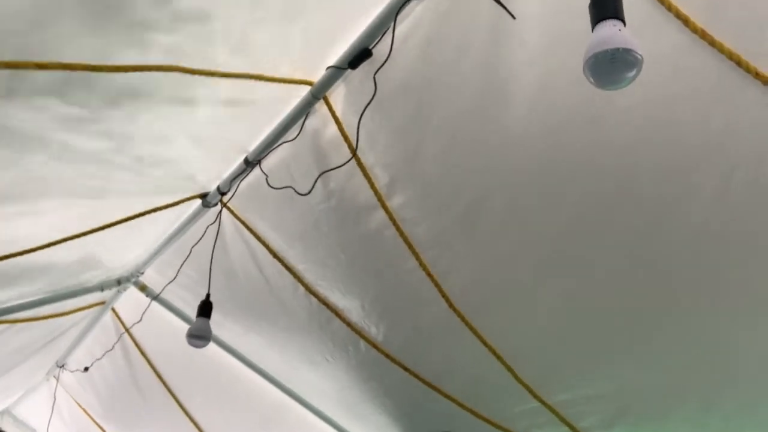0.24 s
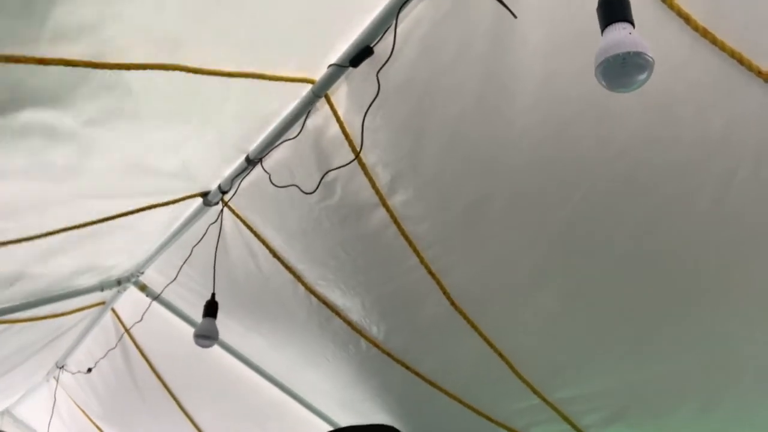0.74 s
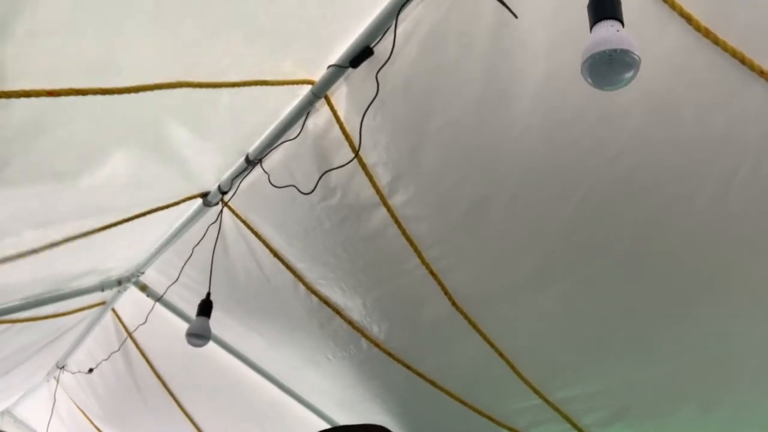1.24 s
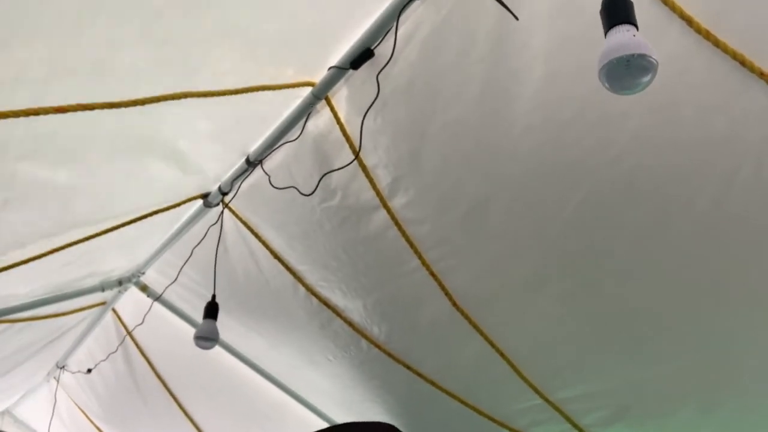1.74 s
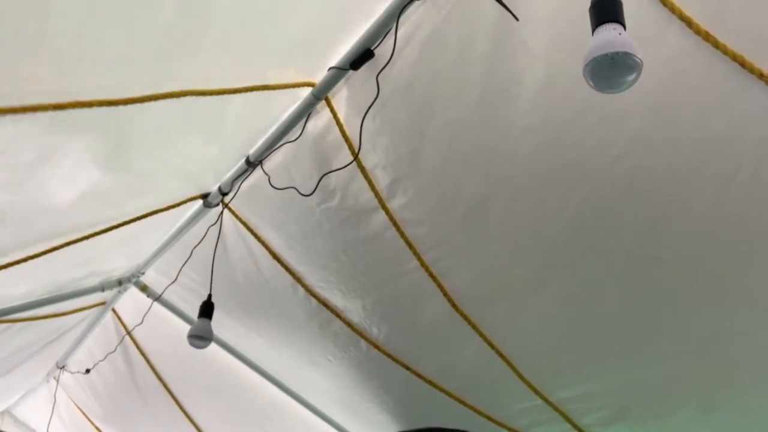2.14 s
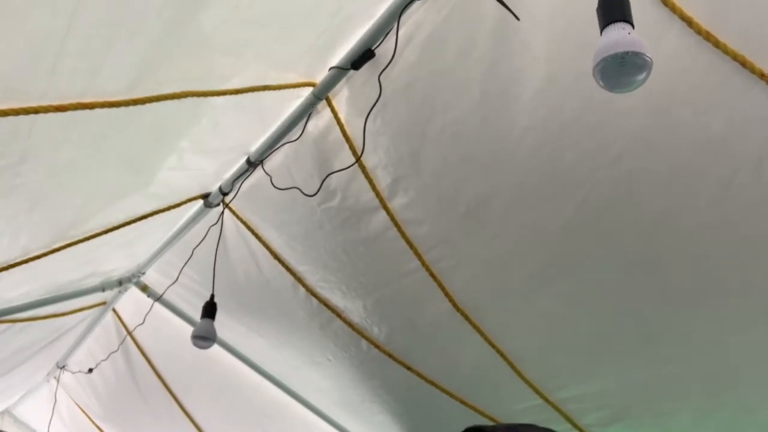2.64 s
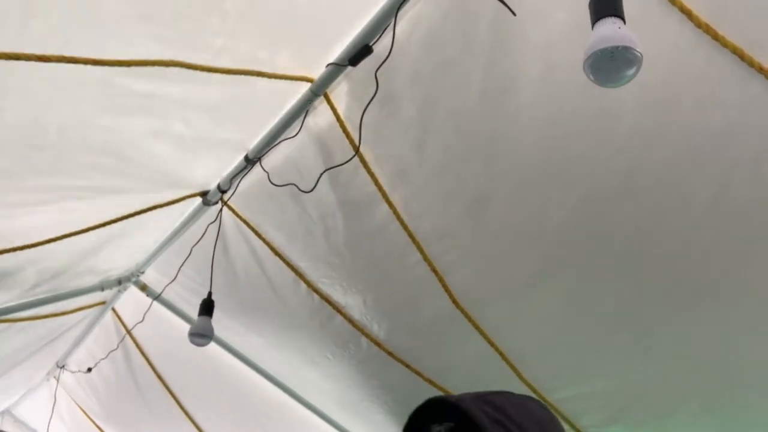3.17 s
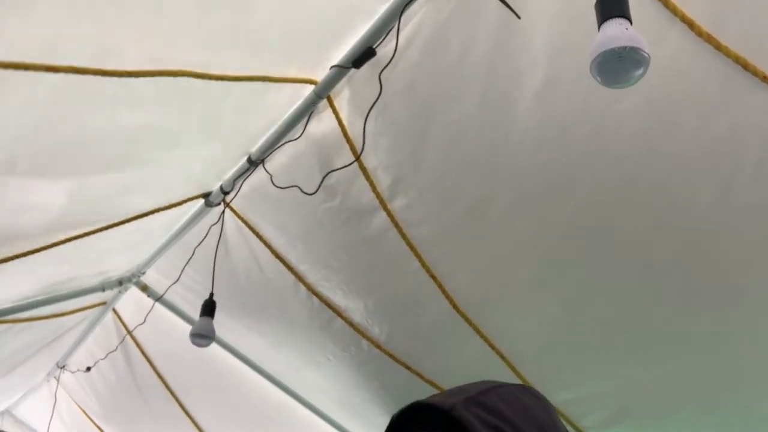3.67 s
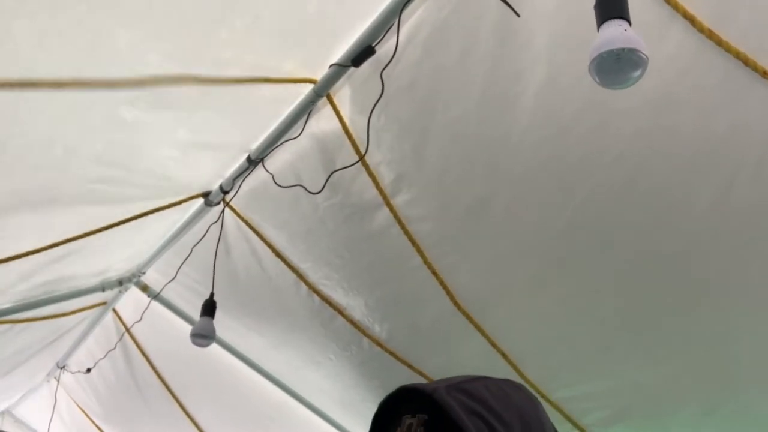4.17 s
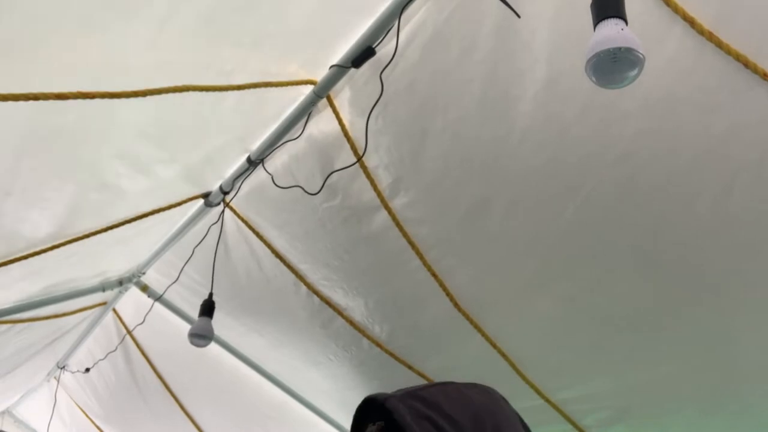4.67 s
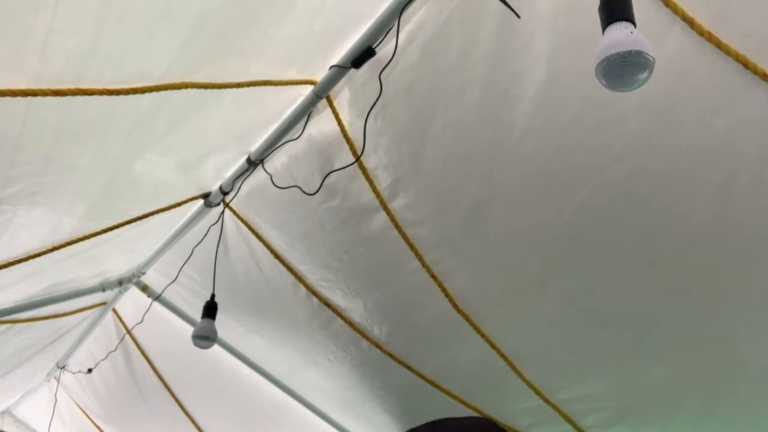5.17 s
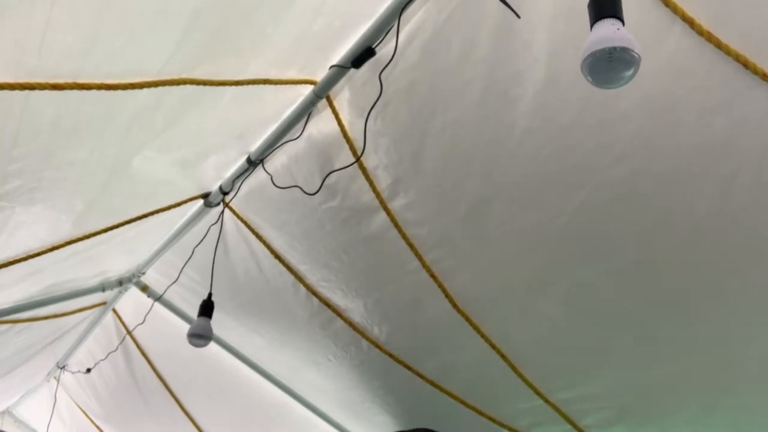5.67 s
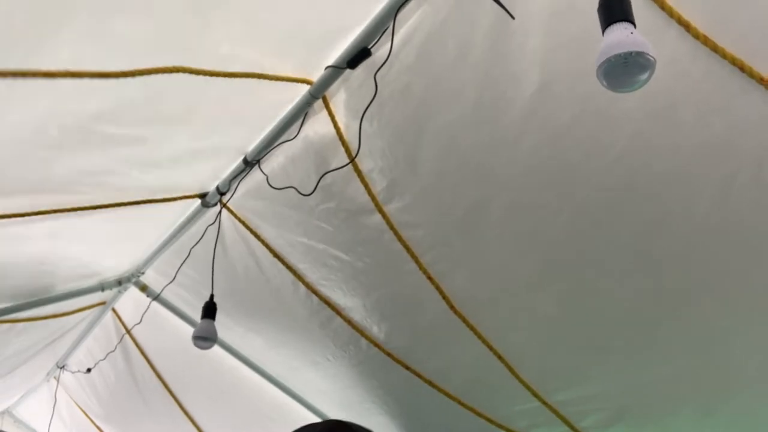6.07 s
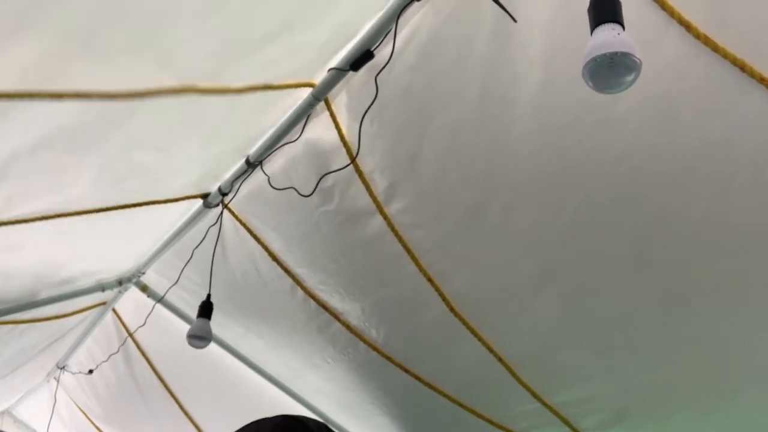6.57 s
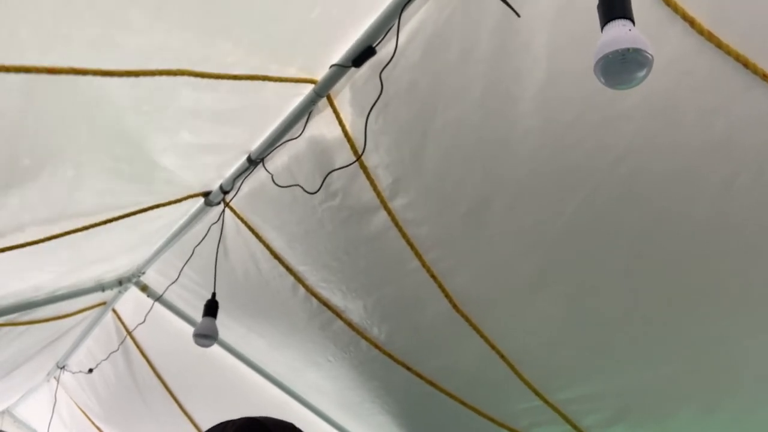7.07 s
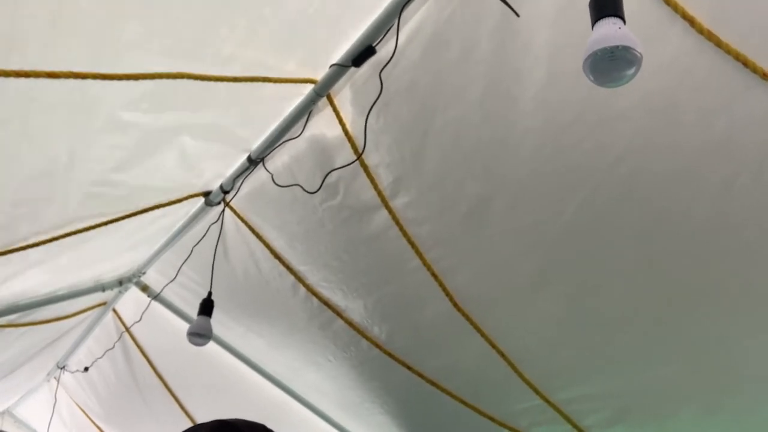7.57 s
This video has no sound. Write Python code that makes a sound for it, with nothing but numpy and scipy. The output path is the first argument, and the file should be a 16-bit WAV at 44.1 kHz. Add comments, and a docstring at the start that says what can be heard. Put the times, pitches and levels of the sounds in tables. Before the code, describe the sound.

Three bouts of snow clearing heard from beneath a taut cloth roof. Each begins abruptly with knocks and thumps, continues as irregular scrubs, crackling folds, cloth cracks and soft clump pats over rushing snow, then runs out. The middle bout is densest and loudest. Short gaps hold only small taps and trickling grains. Close stereo microphones, short tent scatter, slightly dulled top, quiet winter air behind.

```python
"""A brush handle knocks and a clump of snow pats the cloth overhead: the start of three bouts of short pushes.
Under a fabric canopy, picked up at two microphone ports, a long brush shoves the snow-laden roof upward.
Noise grains, filtered by layer, make the rumbling and crinkling cloth, the scrubbing brush and hissing snow;
sagging tones make the clumps and thumps, ringing modes the taut panel and handle, and resonant bursts the
slabs, folds and rasping bristles. The slides run out between bouts, over a faint outdoor bed."""
import sys
import numpy as np
from scipy import signal
from scipy.fft import rfft, irfft, next_fast_len
from scipy.io import wavfile
from scipy.ndimage import uniform_filter1d

SR = 44100
rng = np.random.default_rng(int(sys.argv[2]) if len(sys.argv) > 2 else 0)


def generate_wav(signal):
    """Clip the signal to [-1, 1] and save it as 16-bit WAV at the path in sys.argv[1]."""
    frames = np.transpose(np.atleast_2d(signal))
    scaled = np.clip(frames, -1, 1) * 32767
    pcm = np.round(scaled).astype(np.int16)
    wavfile.write(sys.argv[1], SR, pcm)


N = 344862

# Levels in the tables are relative; each layer adds its own trim.
# Left port minus right port: (frequency [Hz], level difference [dB])
PORT_LEVEL_DIFFERENCE = [(35, -4.5), (60, 8), (100, 8), (170, -0.5), (340, 0), (590, 2), (1060, 4),
                         (1870, 4.5), (3320, 6.5), (6500, 7), (9000, 13.5)]
# Lead of the left port over the right: (frequency [Hz], phase [rad])
PORT_PHASE_LEAD = [(25, -3), (45, 0.8), (86, 1), (129, 4.5), (170, 5), (520, 5), (720, 5.5), (880, 5.5),
                   (1100, 6.5), (1450, 7.5), (1800, 8), (2250, 5.5), (2600, 7.5), (3050, 8.5), (3800, 7),
                   (4500, 7), (5000, 5.5), (5600, 0.5), (6100, 1), (7100, -.5), (7800, -6.5), (9500, 3)]
# Spectrum of the quiet place around the canopy: (frequency [Hz], level per Hz [dB])
OUTDOOR_SPECTRUM = [(25, -1), (60, 10), (160, 8), (340, -18), (900, 3), (1800, -16.5), (2600, -20.5),
                    (6800, -29), (10500, -36)]
# Spectrum of the air pumped by the roof: (frequency [Hz], level per Hz [dB])
AIR_SPECTRUM = [(12, -41), (25, -17), (40, -2), (52, 7), (70, -4), (95, 2.5), (130, -3.5), (200, 0),
                (500, -84)]
# Air pumped by the slow sway of the whole roof: (time [s], level [dB])
ROOF_SWAY = [(0.0, -49), (0.15, -32.5), (0.45, -42.5), (1.03, -39), (1.35, -40.0), (2.3, -40.5), (2.7, -56),
             (2.935, -62), (2.96, -32), (3.55, -42), (4.4, -39.5), (4.65, -41.5), (5.05, -53), (5.45, -62),
             (5.965, -76), (6.02, -39.5), (7.05, -44), (7.82, -44)]
# The slack roof bellies out and drops back: (time [s], peak level [dB], starting pitch [Hz])
ROOF_THUMPS = [(0.554, -18.5, 89.5), (0.992, -23, 85), (1.202, -31, 160), (1.595, -28, 116),
               (2.485, -31, 126), (2.953, -10, 149), (3.505, -26, 70), (4.612, -32, 161),
               (6.017, -24.5, 148), (6.575, -24, 100.5), (6.606, -22, 120), (7.38, -28, 90)]
# Spectrum of buckling cloth: (frequency [Hz], level per Hz [dB])
CRINKLE_SPECTRUM = [(700, -17), (1400, 8.5), (2100, 0), (2600, 5.5), (3700, -1), (4800, -9), (7000, -29),
                    (10500, -59)]
# Spectrum of cracks, crunches and dry contacts: (frequency [Hz], level per Hz [dB])
CRACK_SPECTRUM = [(300, -2.5), (1000, 6), (1500, -8.5), (2500, -2.5), (3800, -5.5), (5200, -8),
                  (7000, -11.5), (9500, -24.5), (10800, -51.5)]
# The cloth snaps taut, or scrapes where the body is weak: (time [s], crack peak level [dB], # drum-like body
# level [dB], pitch of the crease [Hz], level of the lead-in swish against the crack [dB])
CLOTH_SNAPS = [(0.554, -22, -21, 1870, -16), (0.702, -20, -19.5, 2730, -4.5),
               (0.937, -26.5, -41, 2510, -14.5), (0.994, -26.5, -21, 2710, -21),
               (1.131, -28, -29, 1490, -22), (1.205, -7.5, -3, 3670, -10), (1.622, -29, -27, 2470, -13),
               (1.669, -12.5, -33.5, 3270, -5.5), (2.128, -31.5, -23, 2400, -13.5),
               (2.169, -30, -36.5, 2800, -10.5), (2.38, -46, -35, 1710, -12),
               (2.485, -34.5, -24.5, 2700, -24.5), (2.644, -48, -46.5, 2100, -25),
               (2.772, -47.5, -44, 3640, -17), (2.951, -19, -21, 4250, -28), (2.963, -17, -27.5, 3200, -17),
               (3.0202, -26.5, -15, 2900, -23.5), (3.096, -14, -26, 2710, -17),
               (3.215, -26, -30.5, 2500, -7), (3.2444, -11, -31.5, 2720, -9.5),
               (3.270, -12.5, -12.5, 4000, -12.5), (3.361, -20.5, -35.5, 4080, -18),
               (3.543, -28.5, -31, 2500, -17), (3.666, -15.5, -18.5, 4130, -19),
               (4.096, -13, -33, 2040, -9), (4.192, -17, -20, 3870, -19), (4.617, -9.5, -3.5, 2610, -8.5),
               (4.977, -43, -45, 2980, -18), (5.374, -41.5, -38.5, 4250, -12), (5.790, -50, -45, 2200, -5),
               (5.977, -27.5, -27, 3280, -14), (6.077, -31, -16, 2540, -6.5), (6.531, -21, -28, 3500, -9.5),
               (6.584, -18.5, -30.5, 2200, 0.5), (6.592, -21, -14.5, 1900, -17),
               (6.631, -18.5, -11.5, 2800, -1), (6.648, -21, -11, 3260, -12),
               (6.831, -26.5, -33, 2690, -13), (6.885, -26.5, -17, 2440, -16.5),
               (7.195, -27, -25, 2270, -23), (7.282, -20, -28, 3050, -8), (7.326, -30, -17.5, 2240, -11),
               (7.376, -18.5, -29.5, 2450, -22)]
# What a taut panel rings with at its usual tension: (frequency [Hz], level [dB], t60 [s])
PANEL_MODES = [(159.5, 4.5, 0.064), (232, 7.5, 0.017), (329.4, 1.5, 0.076), (770, 7.5, 0.0042),
               (974, 0, 0.03)]
# Spectrum of heavy lumps drumming on the roof: (frequency [Hz], level per Hz [dB])
RUMBLE_SPECTRUM = [(90, -20), (125, -9.5), (168, 2), (235, -6), (320, 0.5), (440, -5), (620, -18.5),
                   (1100, -28.5), (3000, -85.5)]
# Spectrum of snow crystals rubbing over the weave: (frequency [Hz], level per Hz [dB])
HISS_SPECTRUM = [(900, 7.5), (2000, -6.5), (3000, 1.5), (4300, 1), (5000, 1), (5700, -1), (6700, 1.5),
                 (7700, -3), (9000, -6.5), (9800, -15.5), (10600, -70)]
# Snow set off at once in each bout, then running out:
# (time [s], level of heavy lumps [dB], level of fine powder [dB])
FIRST_BOUT_SLIDE = [(0.0, -44, -39), (0.395, -39.5, -43.5), (0.798, -40, -43.5), (1.148, -38, -41.5),
                    (1.748, -38, -46), (2.273, -48, -49), (2.518, -44.5, -57.5), (2.6, -51, -61),
                    (2.696, -54, -60.5), (2.816, -68.5, -66.5), (2.928, -63, -67)]
SECOND_BOUT_SLIDE = [(2.947, -40, -39.5), (3.171, -28.5, -38), (3.39, -31, -34.5), (3.718, -30, -38.5),
                     (3.993, -29, -41), (4.495, -31, -42), (4.67, -29.5, -39.5), (4.8, -33, -43.5),
                     (4.9, -37.5, -47.5), (4.961, -48.5, -51), (5.15, -48, -52.5), (5.25, -56.5, -55),
                     (5.39, -58.5, -60), (5.495, -75, -60), (5.62, -67, -62.5), (5.727, -64, -57),
                     (5.966, -66, -69.5)]
THIRD_BOUT_SLIDE = [(5.987, -29.5, -36.5), (6.134, -29.5, -46), (6.484, -38, -41.5), (6.771, -27, -42),
                    (7.06, -42.5, -45.5), (7.15, -32, -45.5), (7.436, -36, -46), (7.68, -31, -47),
                    (7.749, -53, -49.5), (7.82, -64, -55)]
# Clumps land on the roof: (time [s], peak level [dB], pitch they settle to [Hz])
CLUMP_PATS = [(0.123, -20.5, 400), (0.192, -27, 594), (0.556, -28, 250), (0.635, -19.5, 570),
              (0.993, -17, 530), (1.421, -21.5, 716), (3.399, -16.5, 595), (4.184, -21.5, 198),
              (4.221, -18.5, 262), (4.39, -22.5, 323), (4.578, -18, 654), (4.764, -26.5, 338),
              (4.792, -20.5, 354), (4.885, -34, 183), (4.992, -39.5, 347), (5.093, -41.5, 290),
              (5.134, -53, 248), (5.279, -37, 344), (5.37, -34.5, 340), (5.546, -46, 600),
              (5.641, -47.5, 296), (5.782, -44, 223), (5.824, -43, 298), (5.913, -40, 310),
              (6.016, -17.5, 340), (6.132, -18.5, 497), (6.341, -22, 252), (6.516, -29.5, 335),
              (7.042, -27, 490), (7.09, -49.5, 308), (7.139, -27, 660), (7.347, -16.5, 556),
              (7.505, -29, 260), (7.703, -31.5, 258), (7.771, -32, 590)]
# Heavy slabs slump on the roof: (time [s], length [s], level [dB], pitch [Hz])
SLAB_SLUMPS = [(2.425, 0.025, -44, 168), (2.66, 0.026, -45.5, 202), (3.44, 0.02, -26, 170),
               (3.505, 0.012, -20, 165), (4.622, 0.0075, -22, 191), (6.606, 0.048, -21, 623),
               (6.682, 0.028, -17.5, 295), (6.887, 0.015, -30, 476), (7.233, 0.018, -26.5, 348),
               (7.334, 0.077, -28, 300), (7.623, 0.034, -26.5, 392)]
# Spectrum of the brush head sticking and slipping: (frequency [Hz], level per Hz [dB])
SCRUB_SPECTRUM = [(250, -10.5), (420, -9), (550, 5.5), (720, 4.5), (880, 1.5), (1100, 1), (1400, -9),
                  (1700, -13), (2100, -27.5), (4000, -73)]
# Pushes of the brush: (start time [s], length [s], force level [dB], growth of the force during the push [dB],
# crinkle against force [dB], loosened powder against force [dB], pitch of the rubbed patch [Hz])
BRUSH_PUSHES = [(0.125, 0.099, -28.5, 0, -5.5, -5.5, 870), (0.302, 0.042, -34.5, 5, -11.5, -28, 435),
                (0.573, 0.056, -30.5, -11.5, -9.5, -8.5, 587), (0.64, 0.069, -28.5, 4, -4.5, -7, 605),
                (0.856, 0.094, -37, 4.5, -3.5, -10.5, 847), (1.002, 0.02, -33, -3.5, -5, -7.5, 487),
                (1.082, 0.13, -28, 8, -7, -9.5, 372), (1.376, 0.06, -37.5, 15.5, -6.5, -6, 670),
                (1.592, 0.066, -28, 9, -4, -12.5, 635), (1.805, 0.096, -37.0, 5, -7, -7.5, 613),
                (2.02, 0.17, -36.5, -4, -14, -40, 360), (2.315, 0.11, -38, 2, -11, -26, 232),
                (2.477, 0.007, -38.5, -5.5, -5.5, -22, 360), (2.872, 0.04, -56, -6, -4, -24, 870),
                (2.985, 0.0097, -32, -1.5, -23, -16, 766), (3.031, 0.065, -26.5, -5.5, -11.5, -29.5, 342),
                (3.222, 0.067, -24.5, 0.5, 0.5, -11.5, 735), (3.396, 0.05, -29.5, 1, -8.5, -2, 306),
                (3.492, 0.056, -25.5, 6.5, -7, -8.5, 304), (3.613, 0.054, -26, -1, -7, -31, 703),
                (3.768, 0.13, -31, 0, -6.5, -4.5, 275), (4.041, 0.063, -27.5, 0, -1.5, -15, 880),
                (4.18, 0.12, -34, 4.5, 1, -3.5, 1210), (4.608, 0.0033, -25, 7.5, -5, -6, 563),
                (5.274, 0.11, -53, -2, -21.5, -17, 352), (5.725, 0.06, -61.5, 6.5, -24, -21, 1030),
                (5.806, 0.11, -52.5, 2, -26, -20, 720), (6.03, 0.051, -25.5, -6.5, -7.5, -27.5, 324),
                (6.124, 0.046, -31.5, -7, -9, -22.5, 595), (6.215, 0.097, -25, 2.5, -10, -21.5, 364),
                (6.548, 0.15, -27, 6.5, -4, -14, 1100), (6.834, 0.066, -24.5, 7.5, -11, -24, 550),
                (7.2, 0.043, -33.5, -6, -3, -7.5, 350), (7.277, 0.1, -27, -5, -4, -16, 1144),
                (7.42, 0.016, -31, -5, -17.5, -27, 464), (7.602, 0.036, -35.5, -9, -19, -25, 517),
                (7.792, 0.082, -36, 1.5, -2.5, -4.5, 228)]
# Bristles catch on the coated cloth: (time [s], length [s], level [dB], pitch [Hz])
BRISTLE_RASPS = [(0.202, 0.012, -32, 2500), (1.130, 0.005, -35, 4750), (1.654, 0.014, -22.5, 2430),
                 (2.644, 0.0044, -53, 2030), (2.768, 0.0072, -62, 3280), (2.96, 0.0052, -23, 3150),
                 (3.024, 0.005, -31, 2900), (3.064, 0.008, -28, 2600), (3.097, 0.0098, -33, 4900),
                 (3.424, 0.012, -28, 2840), (3.496, 0.01, -28.5, 2670), (3.664, 0.007, -33, 5250),
                 (3.726, 0.0103, -33, 2500), (3.78, 0.01, -32, 2330), (4.035, 0.02, -34, 2240),
                 (4.08, 0.029, -29, 2100), (4.988, 0.013, -49, 3010), (5.155, 0.005, -52, 3700),
                 (5.645, 0.004, -58, 2900), (6.022, 0.01, -37, 3100), (6.147, 0.008, -40, 2760),
                 (6.186, 0.0054, -37, 2240), (6.551, 0.01, -34.5, 2550), (6.581, 0.011, -27, 5200),
                 (6.586, 0.005, -22.5, 3820), (6.65, 0.0057, -33, 2360), (6.679, 0.012, -36, 2150),
                 (6.829, 0.008, -30, 2670), (6.882, 0.013, -28.5, 2500), (7.195, 0.006, -42, 4820),
                 (7.282, 0.01, -39, 5340), (7.375, 0.0035, -20, 2500)]
# The handle knocks in its socket: (time [s], peak level [dB], upper modes against the lowest [dB])
SOCKET_KNOCKS = [(0.087, -18.5, 9), (0.474, -19.5, 3), (0.664, -18, 17), (0.935, -19.5, 6),
                 (1.076, -22, 11), (1.130, -17, -3), (1.623, -16, 4), (1.665, -13.5, -5), (2.567, -36, 6),
                 (2.851, -37, 2), (2.953, -20, 0), (2.9655, -12.5, -9), (3.021, -13.5, -4.5),
                 (3.198, -15.5, 12), (3.296, -17, 12), (3.543, -14, -12), (3.622, -22, -1),
                 (3.666, -12, -7), (4.102, -18, 5), (4.176, -20, 5), (4.272, -16.5, 17), (4.464, -19.5, 5),
                 (5.011, -36, 12), (5.281, -38, 12), (5.370, -40, 3), (5.463, -46, 8), (5.563, -49, 6),
                 (5.643, -44, 2), (5.826, -40, -2), (5.856, -38, -3), (5.887, -34, -6), (5.9135, -27, -7),
                 (6.019, -22, -7), (6.133, -18, -11), (6.208, -27, -1), (6.563, -24, -3), (6.5925, -10, 4),
                 (6.675, -11.5, -11), (7.197, -25, 7), (7.285, -19, 15)]
# What the handle rings with before the grip detunes it: (frequency [Hz], level [dB], t60 [s])
HANDLE_MODES = [(732, 5.5, 0.024), (941, -1, 0.031), (1095, -1, 0.027)]

TENT_T60_S, CUTOFF_HZ, OUTDOORS_DB = 0.14, 10400, -71
# Thumps, counted in cycles of the starting pitch: until the pitch has halved; decay by 60 dB
THUMP_SAG_CYCLES, THUMP_T60_CYCLES = 3.3, 16.6
# The jerk of a snap: starting pitch, time to halve it, decay, level against the body
WHIP_HZ, WHIP_FALL_S, WHIP_T60_S, WHIP_DB = 3520, 0.00061, 0.026, -5
CRACK_T60_S = 0.036
# Attack times are the last 20 dB of the rise; t60 follows the end of the event
PUSH_ATTACK_S, PUSH_T60_S = 0.037, 0.15
SLUMP_ATTACK_S, SLUMP_T60_S = 0.0045, 0.082
RASP_ATTACK_S, RASP_T60_S = 0.0015, 0.03
# Layers against the force of the push
PUSH_RUMBLE_DB, PUSH_SCRUB_DB, PUSH_BILLOW_DB = -1.5, -0.33, -8.5
# Rumble and scrub against the lumps; crinkle and hiss against the powder; trim of the sway
SLIDE_RUMBLE_DB, SLIDE_SCRUB_DB = -2, -2.0
SLIDE_CRINKLE_DB, SLIDE_HISS_DB = 0, 0.5
SWAY_DB = 0.5
# The sliding snow breaks into lumps: how fast and how far its level swings
CLUMPING_RATE_HZ, CLUMPING_DB = 22, 1.36
SLUMP_WIDTH = 0.45  # narrower resonance of the boom, as a share of its pitch
# The patch under the brush head: mean slip rate, resonance width, level against the force
PATCH_SLIPS_PER_S, PATCH_WIDTH_HZ, PATCH_DB = 190, 50, -8.5
# Bristles skipping over the weave: narrower resonance of the fold, mean slip rate
RASP_WIDTH_HZ, RASP_SLIPS_PER_S = 320, 1900
# The bristles soften the blow; level of the ring; level of the dry contact tick
KNOCK_RISE_S, KNOCK_DB, KNOCK_TICK_DB = 0.0016, -2.5, -21


def from_db(db):
    """Decibels to amplitude gain."""
    return 10 ** (np.asarray(db) / 20)


def together(*levels_db):
    """The level of several unrelated sounds at once: their powers add."""
    return 10 * np.log10(sum(from_db(db) ** 2 for db in levels_db) + 1e-12)


def rms_one(x):
    """Scale a sound so that the mean of its channels has rms 1."""
    middle = np.atleast_2d(x).mean(axis=0)
    return x / np.sqrt(np.mean(middle ** 2) + 1e-20)


def evened(x, size):
    """Hold the level steady over about size samples, keeping the fine grain; rms 1."""
    power = uniform_filter1d(np.mean(x ** 2, axis=0), size)
    return rms_one(x / np.sqrt(power + 1e-6))


def in_time(rows):
    """Interpolate the columns of a curve, sample by sample."""
    times, *columns = np.transpose(rows)
    return [np.interp(np.arange(N) / SR, times, column) for column in columns]


def at_hz(points, hz):
    """Read a table on a log-frequency axis."""
    points = np.array(points)
    return np.interp(np.log(hz + 1), np.log(points[:, 0]), points[:, 1])


def add(track, s, sound):
    """Lay a short sound into a track at time s."""
    start = int(np.clip(round(s * SR), 0, N - 1))
    track[..., start:start + sound.shape[-1]] += sound[..., :N - start]


def drift(rate):
    """Slow chance with spread 1: noise through two equal poles at rate [Hz], drawn every 40 samples."""
    pole = np.exp(-80 * np.pi * rate / SR)
    noise = rng.standard_normal(N // 40 + 2002)
    slow = signal.lfilter([1], [1, -2 * pole, pole * pole], noise)[2000:]  # drop the filter's run-in
    return np.interp(np.arange(N) / 40, np.arange(len(slow)), rms_one(slow))


def colour(x, spectrum, size=4096):
    """Causal (minimum-phase) filter with the given spectrum."""
    gain = from_db(at_hz(spectrum, np.fft.rfftfreq(size, 1 / SR)))
    cepstrum = irfft(np.log(gain))
    cepstrum[1:size // 2] *= 2
    cepstrum[size // 2 + 1:] = 0
    impulse = irfft(np.exp(rfft(cepstrum)))
    return signal.oaconvolve(x, impulse[None], axes=1)[:, :N]


def ports(x):
    """The recorder's body shades and delays one microphone port against the other."""
    size = next_fast_len(N + SR // 10)
    hz = np.fft.rfftfreq(size, 1 / SR)
    tilt = from_db(at_hz(PORT_LEVEL_DIFFERENCE, hz))
    delay = np.exp(-1j * at_hz(PORT_PHASE_LEAD, hz))
    pair = np.array([tilt, delay]) * 2 / (tilt + 1)
    return irfft(rfft(x, size) * pair, size)[:, :N]


def tent(clicks, wet_db):
    """Every click arrives directly, then as a brief scatter off the cloth, different at each port."""
    keep = from_db(-120 / (TENT_T60_S * SR))  # energy kept per sample
    energy = signal.lfilter([0, 1 - keep], [1, -keep], clicks ** 2 + 1e-18)
    scatter = np.sqrt(energy) * rng.standard_normal((2, len(clicks)))
    return (clicks + from_db(wet_db) * scatter) / np.hypot(1, from_db(wet_db))


def struck(ringing, wet_db):
    """A ringing sound set off by one blow somewhere on the roof, with its scatter."""
    blow = np.zeros(SR // 8)
    blow[0] = 1
    return signal.oaconvolve(tent(blow, wet_db), ringing[None], axes=1)


def grains(per_s, spread_db, wet_db, spectrum):
    """Tiny contacts of uneven size, scattered through the tent; rms 1."""
    sizes = from_db(spread_db * np.minimum(rng.exponential(1, N), 4))
    sizes = sizes * rng.choice([-1, 1], N)
    happens = rng.random(N) < per_s / SR
    clicks = sizes * happens / np.sqrt(np.minimum(per_s, SR))  # density leaves the level alone
    return rms_one(ports(colour(tent(clicks, wet_db), spectrum)))


def crease(burst, hz, width_hz):
    """The resonance of one small patch of stiff cloth, gain about 1 at its top."""
    r = np.exp(-np.pi * width_hz / SR)
    zeros = np.array([1, 0, -1]) * (1 - r * r) / 2
    poles = [1, -2 * r * np.cos(2 * np.pi * hz / SR), r * r]
    return signal.lfilter(zeros, poles, burst)


def scattered_ticks(level_db, low_hz, octaves, width_hz, over_db, count):
    """Small resonant contacts at random times, each with its own pitch, louder when the roof is busy."""
    out = np.zeros((2, N))
    t = np.arange(SR // 25) / SR
    for when, size, pitch in rng.random((count, 3)):
        shared = rng.standard_normal(len(t))
        own = rng.standard_normal((2, len(t)))  # differs between the channels
        burst = (shared + 0.85 * own) * from_db(-60 * t / 0.026)
        tick = crease(burst, low_hz * 2 ** (octaves * pitch), width_hz)
        peak_db = level_db[int(when * N)] + over_db + 1.0 * size ** 2
        add(out, when * N / SR, from_db(peak_db) * tick / abs(tick).max())
    return ports(out)


def quiet_outdoors():
    """The quiet winter day around the canopy: steady coloured noise, independent in the two channels."""
    return from_db(OUTDOORS_DB) * rms_one(colour(rng.standard_normal((2, N)), OUTDOOR_SPECTRUM))


def billowing_roof(level_db):
    """The roof pumps air as it sways; the longest waves reach both ports alike."""
    highpass = signal.butter(2, 55, "high", fs=SR, output="sos")
    eddies = signal.sosfilt(highpass, rng.standard_normal((2, N)))
    sway = rng.standard_normal(N) + 1.34 * eddies
    return from_db(level_db - 1.5) * evened(ports(colour(sway, AIR_SPECTRUM)), size=6000)


def roof_thumps():
    """The loaded roof bounces with a deep thump whose pitch sinks as the cloth goes slack."""
    out = np.zeros((2, N))
    t = np.arange(SR // 4) / SR
    for s, db, hz in ROOF_THUMPS:
        cycles = hz * t
        swing = (1 - np.exp(-cycles / 0.6)) ** 2 * from_db(-60 * cycles / THUMP_T60_CYCLES)
        turns = THUMP_SAG_CYCLES * np.log1p(cycles / THUMP_SAG_CYCLES)
        thump = swing / swing.max() * np.sin(2 * np.pi * turns)
        add(out, s, struck(from_db(db - 4.5) * thump, wet_db=-7.0))
    return ports(out)


def crinkling_cloth(level_db):
    """Stiff coated cloth buckles in small flurries of creases."""
    per_s = 1800 * from_db(0.5 * (level_db + 38.5))
    creases = grains(per_s, spread_db=3.3, wet_db=2.5, spectrum=CRINKLE_SPECTRUM)
    return from_db(level_db + 1.7 * drift(32) - 5.5) * creases


def popping_folds(level_db):
    """Single folds flip over with a dry tick."""
    return scattered_ticks(level_db, low_hz=1500, octaves=1.8, width_hz=200, over_db=2.5, count=480)


def whip():
    """The jerk of a snap spreads through the cloth, treble first: a quickly falling chirp, peak near 1."""
    t = np.arange(SR // 30) / SR
    turns = WHIP_HZ * WHIP_FALL_S * np.log1p(t / WHIP_FALL_S)
    return np.sin(2 * np.pi * turns) * from_db(-60 * t / WHIP_T60_S)


def ringing_panel():
    """A taut panel rings in decaying modes; no two snaps find it equally tight."""
    t = np.arange(SR // 6) / SR
    tension = 1 + 0.021 * rng.standard_normal()
    panel = np.zeros(len(t))
    for k, (hz, db, t60) in enumerate(PANEL_MODES):
        mode = from_db(db - 60 * t / t60) * np.sin(2 * np.pi * hz * tension * t)
        panel += (-1) ** k * mode
    return panel


def taut_snaps():
    """The slack runs out in a rising swish, the cloth cracks, and the panel rings like a slack drum."""
    cracks, drums = np.zeros((2, N)), np.zeros((2, N))
    t = np.arange(SR // 6) / SR
    for s, crack_db, body_db, crease_hz, swish_db in CLOTH_SNAPS:
        swish = rng.standard_normal((2, len(t))) * from_db(swish_db - 60 * t[::-1] / 0.11)
        add(cracks, s - t[-1], from_db(crack_db + 4.0) * swish)
        add(drums, s, from_db(body_db + WHIP_DB) * struck(whip(), wet_db=-14.0))
        crack = rng.standard_normal(len(t)) * from_db(-60 * t / CRACK_T60_S)
        crack = from_db(crack_db + 5.0) * tent(crack, wet_db=-1.0)
        add(cracks, s, crack + 2.2 * crease(crack, crease_hz, width_hz=200))
        panel = from_db(body_db - 8.5) * struck(ringing_panel(), wet_db=-23.5)
        add(drums, s + 0.00284, panel)  # the low waves lag behind the crack
    return ports(colour(cracks, CRACK_SPECTRUM) + drums)


def sliding_snow(level_db):
    """Countless crystals rub over the weave."""
    per_s = 6000 * from_db(0.8 * (level_db + 44.0))
    crystals = grains(per_s, spread_db=2.5, wet_db=4.0, spectrum=HISS_SPECTRUM)
    return from_db(level_db + 0.95 * drift(40) + 0.06) * crystals


def tumbling_snow(level_db):
    """Heavy lumps drum on the membrane; the harder the shove, the more of them."""
    per_s = 500 * from_db(0.5 * (level_db + 34.0))
    lumps = grains(per_s, spread_db=1.0, wet_db=-10.5, spectrum=RUMBLE_SPECTRUM)
    return from_db(level_db + 0.2 * drift(25) - 2.0) * evened(lumps, size=6000)


def rolling_crumbs(level_db):
    """Small lumps knocked loose by the brush hop down the roof."""
    return scattered_ticks(level_db, low_hz=440, octaves=1.5, width_hz=60, over_db=4, count=240)


def flap(hz, cycles, glide, rise):
    """A blow on a membrane: a few cycles that sag in pitch, as the low waves arrive last."""
    turn = np.arange(SR // 4) / SR * hz
    swing = (1 - np.exp(-turn / rise)) ** 2 * from_db(-60 * turn / cycles)
    return swing / swing.max() * np.sin(2 * np.pi * (turn + glide * (1 - np.exp(-turn))))


def landing_clumps():
    """Each clump gives a short hollow pat, and crumbles with a faint crunch."""
    pats, crunches = np.zeros((2, N)), np.zeros((2, N))
    t = np.arange(SR // 12) / SR
    for s, db, hz in CLUMP_PATS:
        pat = from_db(db) * flap(hz, cycles=9, glide=0.4, rise=0.7)
        add(pats, s, struck(pat, wet_db=-3.0))
        crunch = rng.standard_normal((2, len(t))) * from_db(-60 * t / 0.072)
        add(crunches, s, from_db(db - 9.5) * crunch)
    return ports(pats + colour(crunches, CRACK_SPECTRUM))


def slumping_slabs():
    """A slab comes down as a quick crowd of soft blows, and the loaded cloth booms under it."""
    out = np.zeros((2, N))
    t = np.arange(-SR // 20, SR // 5) / SR
    for s, length, db, hz in SLAB_SLUMPS:
        blows = tent(rng.standard_normal(len(t)), wet_db=-15.0)
        boom = crease(blows, hz, SLUMP_WIDTH * hz)
        boom = crease(boom, hz, 2 * SLUMP_WIDTH * hz)
        boom = evened(rms_one(boom), size=900)
        attack_db = 20 * np.minimum(t, 0) / SLUMP_ATTACK_S
        release_db = -60 * np.maximum(t - length, 0) / SLUMP_T60_S
        add(out, s + t[0], boom * from_db(db + attack_db + release_db))
    return ports(out)


def push_shape(t, length, growth_db):
    """A push takes hold fast, grows or eases while it lasts, then the cloth settles; dB."""
    attack = 20 * np.minimum(t, 0) / PUSH_ATTACK_S
    hold = growth_db * (np.clip(t / length, 0, 1) - 0.5)
    release = -60 * np.maximum(t - length, 0) / PUSH_T60_S
    return attack + hold + release


def pushing():
    """Add the powers of all pushes: dB of force, crinkle and loosened powder over time."""
    power = np.zeros((3, N))
    t = np.arange(-SR // 10, SR // 2) / SR
    for s, length, force_db, growth_db, crinkle_db, powder_db, _ in BRUSH_PUSHES:
        shares_db = np.array([[0], [crinkle_db], [powder_db]])
        levels_db = force_db + push_shape(t, length, growth_db) + shares_db
        add(power, s + t[0], from_db(levels_db) ** 2)
    return 10 * np.log10(power + 1e-12)


def handle_knocks():
    """The handle gives a short hollow knock; where it is hit decides how much the upper modes speak."""
    rings, ticks = np.zeros((2, N)), np.zeros((2, N))
    t = np.arange(SR // 12) / SR
    for s, db, upper_db in SOCKET_KNOCKS:
        grip = 1 + 0.025 * rng.standard_normal(len(HANDLE_MODES))  # the grip detunes each mode a little
        ring = np.zeros(len(t))
        for k, (hz, mode_db, t60) in enumerate(HANDLE_MODES):
            swing = from_db(mode_db + upper_db * (k > 0) - 60 * t / t60)
            ring += swing * np.sin(2 * np.pi * hz * grip[k] * t)
        ring = ring * (1 - np.exp(-t / KNOCK_RISE_S))
        knock = from_db(db + KNOCK_DB) * ring / abs(ring).max()
        add(rings, s, struck(knock, wet_db=-9.5))
        tick = rng.standard_normal((2, len(t))) * from_db(-60 * t / 0.03)
        add(ticks, s, from_db(db + KNOCK_TICK_DB) * tick)
    return ports(rings + colour(ticks, CRACK_SPECTRUM))


def rasping_bristles():
    """The bristles skip over a tight fold in a quick run of slips, and the fold rings at its own pitch."""
    out = np.zeros((2, N))
    t = np.arange(-SR // 50, SR // 12) / SR
    for s, length, db, hz in BRISTLE_RASPS:
        slips = rng.standard_normal(len(t)) * (rng.random(len(t)) < RASP_SLIPS_PER_S / SR)
        rasp = crease(tent(slips, wet_db=6.5), hz, RASP_WIDTH_HZ)
        rasp = crease(rasp, hz, 4 * RASP_WIDTH_HZ)
        rasp = evened(rms_one(rasp), size=300)
        attack_db = 20 * np.minimum(t, 0) / RASP_ATTACK_S
        release_db = -60 * np.maximum(t - length, 0) / RASP_T60_S
        add(out, s + t[0], rasp * from_db(db - 5.5 + attack_db + release_db))
    return ports(out)


def rubbed_patches():
    """Each push tightens one patch of cloth, which the slipping bristles set droning at its own pitch."""
    out = np.zeros((2, N))
    t = np.arange(-SR // 10, SR // 3) / SR
    for s, length, force_db, growth_db, _, _, patch_hz in BRUSH_PUSHES:
        slips = rng.standard_normal(len(t)) * (rng.random(len(t)) < PATCH_SLIPS_PER_S / SR)
        drone = crease(tent(slips, wet_db=-14.0), patch_hz, PATCH_WIDTH_HZ)
        drone = evened(rms_one(drone), size=2500)
        drone_db = force_db + PATCH_DB + push_shape(t, length, growth_db)
        add(out, s + t[0], drone * from_db(drone_db))
    return ports(out)


def scrubbing_brush(level_db):
    """The brush head sticks and slips on the loaded cloth."""
    per_s = 1400 * from_db(0.5 * (level_db + 34))
    slips = grains(per_s, spread_db=0.5, wet_db=-2.0, spectrum=SCRUB_SPECTRUM)
    return from_db(level_db - 3.5) * evened(from_db(2.3 * drift(30)) * slips, size=6000)


def scene():
    """Pushes and sliding snow drive the roof's continuous layers; single events follow their tables."""
    force_db, buckling_db, loosened_db = pushing()
    lumps_db, powder_db = in_time([*FIRST_BOUT_SLIDE, *SECOND_BOUT_SLIDE, *THIRD_BOUT_SLIDE])
    lumps_db = lumps_db + CLUMPING_DB * drift(CLUMPING_RATE_HZ)
    sway_db, = in_time(ROOF_SWAY)

    billow_db = together(sway_db + SWAY_DB, force_db + PUSH_BILLOW_DB)
    crinkle_db = together(powder_db + SLIDE_CRINKLE_DB, buckling_db)
    hiss_db = together(powder_db + SLIDE_HISS_DB, loosened_db)
    rumble_db = together(lumps_db + SLIDE_RUMBLE_DB, force_db + PUSH_RUMBLE_DB)
    scrub_db = together(lumps_db + SLIDE_SCRUB_DB, force_db + PUSH_SCRUB_DB)

    roof = billowing_roof(billow_db) + roof_thumps()
    cloth = crinkling_cloth(crinkle_db) + popping_folds(crinkle_db) + taut_snaps()
    moving_snow = sliding_snow(hiss_db) + tumbling_snow(rumble_db) + rolling_crumbs(scrub_db)
    falling_snow = landing_clumps() + slumping_slabs()
    brush = handle_knocks() + rasping_bristles() + rubbed_patches() + scrubbing_brush(scrub_db)
    return quiet_outdoors() + roof + cloth + moving_snow + falling_snow + brush


def record(dry):
    """The recorder rounds only the very highest peaks and cuts the top of the spectrum."""
    rounded = dry / (1 + (dry / 0.85) ** 6) ** (1 / 6)
    lowpass = signal.ellip(12, 0.1, 90, CUTOFF_HZ, fs=SR, output="sos")
    return signal.sosfilt(lowpass, rounded)


dry = scene()
out = record(dry)
generate_wav(out)
```